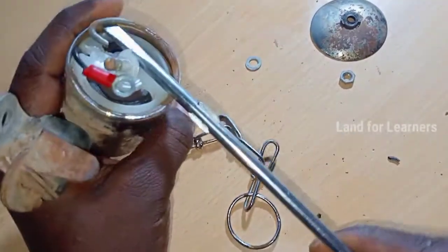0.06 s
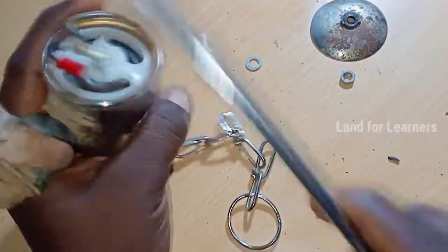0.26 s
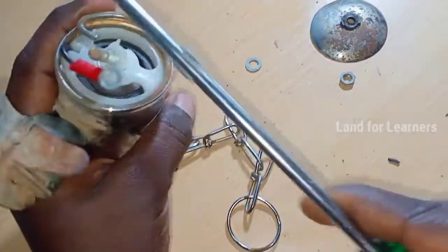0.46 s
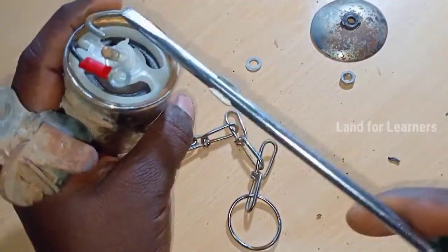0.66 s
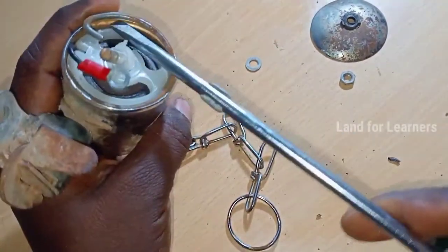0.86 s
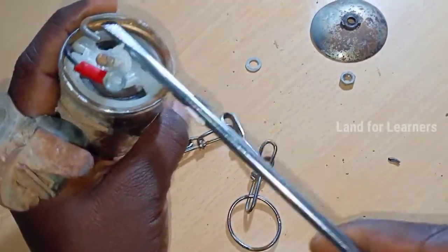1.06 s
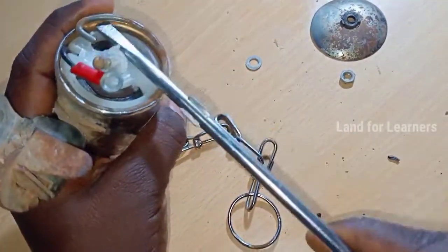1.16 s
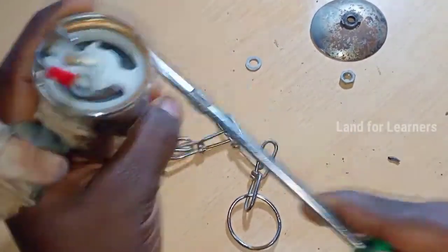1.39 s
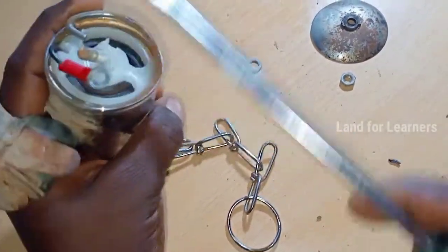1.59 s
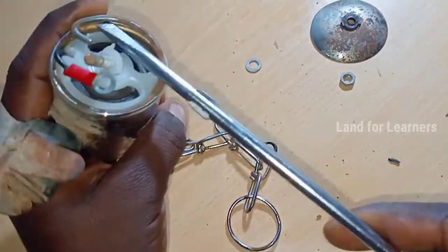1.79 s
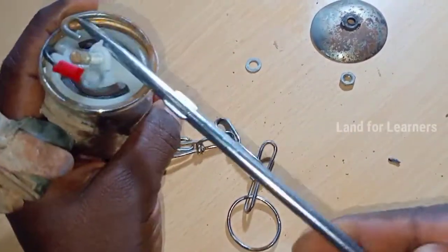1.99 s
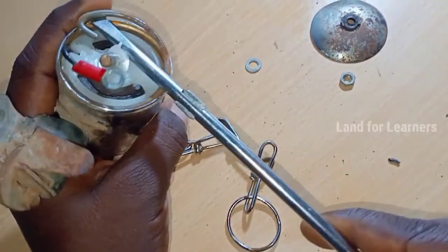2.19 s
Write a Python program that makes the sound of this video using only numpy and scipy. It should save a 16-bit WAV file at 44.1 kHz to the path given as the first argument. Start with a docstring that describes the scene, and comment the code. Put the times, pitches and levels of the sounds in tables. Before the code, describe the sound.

A flat steel blade pries inside a small metal housing: a sharp double clack and gritty scrape early, lighter clicks, another strong clink with scraping midway, then faint taps. Close microphone, hard-walled room, quiet background air.

```python
"""A flat steel blade pries at a ring inside a small hand-held metal housing, in a hard-walled room.
First the scrape rises and the blade taps and catches, loudest near 0.22 and 0.32 s; lighter taps follow.
Near 1.22 s comes another strong contact, then sparser, weaker ones; in all the blade slips hard twice.
Taps are noise-driven modes and swelling sines that the hand damps in milliseconds; scrapes are coloured
grains, bumps are low noise. The room answers with echoes and a tail; faint air and whine run throughout."""
import sys
import numpy as np
from scipy import signal
from scipy.fft import rfft, irfft, next_fast_len
from scipy.io import wavfile
from scipy.ndimage import uniform_filter1d

SR = 44100
rng = np.random.default_rng(int(sys.argv[2]) if len(sys.argv) > 2 else 0)


def dump_mix(stems):
    """Bounce the given channels to the path in sys.argv[1] as a 16-bit WAV at rate SR."""
    frames = np.atleast_2d(stems).T  # one column per channel
    limited = np.clip(frames, -1, 1)  # hard clip at full scale
    pcm = np.round(limited * 32767).astype(np.int16)
    wavfile.write(sys.argv[1], SR, pcm)


N = 99225
TIME_S = np.arange(N) / SR

# Blade contacts: t/s, contact decay/s, knock level/dB, clank f/Hz, clank level/dB, shell level/dB,
# ring f/Hz, ring level/dB, rim f/Hz, rim level/dB, tick level/dB, tick slope/(dB/octave), room send/dB
CONTACTS = [(.1855, .0008, -70, 880, -78, -80, 2930, -72, 5000, -80, -58, 10, -4),
            (0.2182, 0.0018, -37.5, 1154, -23.5, -29, 2744, -8.5, 4200, -25, -25.5, -4, -2.5),
            (0.222, 0.0022, -34.5, 1053, -19.5, -24, 2804, -17, 4200, -25, -24.5, 2.5, -1.5),
            (0.2312, 0.0056, -32, 920, -41, -33, 3010, -30, 3700, -31, -39, 0, 4),
            (0.2747, 0.0071, -34, 1230, -31.5, -27, 3040, -36, 3800, -32, -44, -1, 2),
            (0.3235, 0.0024, -33, 1057, -20, -15.5, 2840, -18.5, 3850, -16, -20, -5, 0.5),
            (0.5745, 0.0022, -65, 1100, -45, -43, 2660, -34.5, 3800, -40, -42, -4.5, 3.5),
            (0.7516, .003, -55, 1010, -34.5, -43, 2820, -32.5, 3500, -40, -52, -6, 0.5),
            (.762, 0.0015, -63, 1000, -51, -42.5, 2700, -25.5, 3500, -36.5, -43.5, -7, -2),
            (0.7674, 0.0016, -64, 1040, -56, -49, 2680, -32.5, 3600, -41, -55, -8, -3),
            (0.8455, .0016, -57, 1027, -29, -26, 2580, -19, 4400, -25, -36, -1, 0),
            (1.052, 0.0028, -50, 1180, -57, -49, 2720, -54.5, 3700, -70, -75, -1, 0),
            (1.1254, .001, -62, 1230, -54, -60, 2690, -54.5, 4200, -68, -72, 0.5, -3),
            (1.2191, 0.0069, -40.5, 913, -30, -23.5, 2610, -13, 3600, -23.5, -31, 1.5, -2.5),
            (1.228, 0.0027, -34, 950, -26, -29, 2600, -27, 4300, -37, -38.5, 5, -4),
            (1.2438, 0.0053, -45, 940, -36, -30, 2605, -25.5, 3600, -32.5, -46, -6, 7),
            (1.3295, 0.0056, -45, 1210, -40.5, -37, 2600, -36.5, 3500, -48, -67, -3, 1),
            (1.366, 0.0043, -44, 1120, -59, -42, 2550, -38.5, 3690, -48.5, -63.5, -7, 0),
            (1.4008, 0.0086, -44, 1120, -54.5, -44.5, 3050, -36.5, 4650, -34, -41, -1, -1),
            (1.6696, 0.0025, -58, 1140, -42, -37, 3400, -35.5, 4560, -38.5, -51, 5, 4),
            (1.6794, 0.0013, -61, 1120, -48, -46, 2600, -33, 4840, -44, -44, 3, -10),
            (1.6878, .0019, -62.5, 900, -60, -51.5, 2710, -35.5, 3590, -62, -64, -4.5, -5),
            (1.7453, 0.0022, -66, 1203, -55.5, -41, 3370, -52, 3580, -46, -58, -2, -4),
            (1.7473, .001, -60, 1045, -46.5, -41, 2620, -30, 3580, -55.5, -69, -2.5, -3),
            (1.9219, 0.0046, -58, 920, -51, -43.5, 2713, -39.5, 3700, -44.5, -61.5, -0.5, 1.5),
            (1.9407, 0.0018, -61.5, 1194, -68.5, -60, 3220, -55, 4200, -59, -63, 5, -6),
            (1.9704, 0.0028, -47, 737, -37, -39, 3110, -40.5, 4000, -47.5, -53, 0.5, 0.5),
            (1.976, 0.002, -50, 943, -40, -48, 3065, -40.5, 4830, -41.5, -44, 4, -2),
            (2.227, .0025, -64, 880, -59.5, -63, 2700, -64.5, 3600, -75, -84, 2.5, 3.5)]
# Modes of the housing's shell: f/Hz, level/dB, t60/s
SHELL_MODES = [(1286, 1, 0.016), (1460, -7, 0.035), (1720, 4.5, 0.0037), (1740, 4.5, 0.01),
               (1980, 2, 0.025), (2140, 0, .008)]
# Modes of the housing's rim: f/Hz, level/dB, t60/s
RIM_MODES = [(3294, 0, 0.0051), (3766, 6, 0.0039), (4180, -1, 0.0042), (4737, -3, 0.005),
             (5233, -10.5, 0.0092), (5634, -16, 0.003)]
# Faint lasting rings of the free steel: f/Hz, level re ring level/dB, t60/s
STEEL_MODES = [(905, -42, .5), (1434, -44, 1), (2630, -40, .6), (3080, -39, 0.4), (3278, -41, .5)]
# Spectrum of the dull knock: f/Hz, relative level/dB
KNOCK_SPECTRUM = [(30, -37.5), (100, -9.5), (250, 0), (450, 6), (650, -7.5), (900, -17), (3000, -50.5)]
# Spectrum of the bright tick, before its slope: f/Hz, relative level/dB
TICK_SPECTRUM = [(3000, -17.5), (5500, -4.5), (6400, -3.5), (7200, 2.5), (8400, 1), (9700, -6.5),
                 (12000, -6.5), (13300, -7), (15200, -2.5), (16000, -15.5)]
# Level of the fluttering grit noise that swells and fades through the work: t/s, level before flutter/dB
GRIT_LEVEL = [(.17, -107), (.205, -65), (.235, -34.5), (.31, -40), (.38, -47), (.45, -38), (.52, -46.5),
              (.65, -63), (.8, -86), (.84, -46), (.9, -55), (1.03, -63.5), (1.07, -46), (1.1, -58),
              (1.16, -48), (1.205, -56), (1.235, -32), (1.34, -38), (1.44, -44.5), (1.53, -63),
              (1.62, -81.5), (1.9, -70.5), (2.05, -61), (2.22, -77)]
# Light skids of the edge: start t/s, length/s, level/dB
EDGE_SKIDS = [(0.214, 0.016, -38), (.385, .19, -46), (0.703, 0.023, -46), (0.725, .014, -42),
              (0.803, .012, -55), (0.833, 0.0094, -50), (1.916, 0.014, -45), (1.966, 0.0099, -48),
              (2.14, .04, -64.5)]
# Spectrum of the grit noise: f/Hz, relative level/dB
GRIT_SPECTRUM = [(100, -28), (330, -4.5), (700, -4.5), (920, 0), (1400, 0), (2100, -2.5), (2650, -4),
                 (3500, -5.5), (5000, -28.5), (8000, -30), (10000, -39), (16000, -44)]
# Spectrum of the skids: f/Hz, relative level/dB
SKID_SPECTRUM = [(500, -19), (1600, -6), (2200, -14), (2750, 7.5), (3500, 0), (4800, -13), (6200, -8.5),
                 (9500, -23), (13000, -20.5), (16000, -22)]
# Housing shifting in the hand: t/s, level/dB, decay/s
HAND_BUMPS = [(.224, -32, 0.031), (.32, -42, 0.023), (.748, -49, 0.0087), (1.06, -59, 0.051),
              (1.125, -56, 0.024), (1.218, -39.5, .025), (1.272, -51, .025), (1.745, -57, .025),
              (1.97, -54.5, 0.036)]
# Spectrum of the bumps: f/Hz, relative level/dB
BUMP_SPECTRUM = [(20, 11.5), (45, -11.5), (110, 4.5), (200, -10), (400, -19.5), (1500, -59)]
# Near reflections from table and walls: t/s, level/dB
NEAR_ECHOES = [(.0032, -20.5), (0.0124, -19)]
# Room decay knots, interpolated to band centres (where every t60 is positive): f/Hz, t60/s
ROOM_DECAY = [(150, 1.5), (500, -0.13), (1400, 0.56), (3000, 0.6142), (7000, 0.59), (14000, 0.33)]
# Room tail colour: f/Hz, relative level/dB
ROOM_SPECTRUM = [(100, 1.5), (500, 0.5), (1200, -1), (2700, -3.5), (4000, 1), (7500, 3), (11000, 1),
                 (15000, 7)]
# Spectrum of the room noise: f/Hz, relative level/dB
AIR_SPECTRUM = [(20, -36), (45, -7), (130, 1.5), (250, -5.5), (480, -4.5), (900, -8), (1700, -12.5),
                (2300, -13), (2700, -8), (4000, -24), (6300, -35), (8300, -31), (9500, -36), (16000, -43.5)]

KNOCK_DECAY_S, ATTACK_PER_CONTACT = .004, .3
CLANK_RISE_S, RING_RISE_S, RIM_RISE_S = .001, .0009, .0005
RISE_PER_CONTACT = 0.13  # added to clank and ring rise, per second of contact
SIDE_RING_HZ, SIDE_RING_DB, SIDE_RING_T60_S = 2918, -12.5, .018
RIM_FOCUS_DB_PER_OCTAVE = 23.5  # fall of the rim modes away from the struck one
RIM_TONE_DB = -3
TICK_CENTRE_HZ = 9000
MODE_SPREAD_DB = 1.5
BODY_LOW_HZ, BODY_HIGH_HZ = 972, 6100
GRAINS_PER_S, GRAIN_SPREAD_DB, GRIT_FLUTTER_DB = 4000, 2.6, 2.6
BUMP_RISE_S = 0.0024
ROOM_DB, ROOM_DELAY_S = -11.5, .008
AIR_DB = -64.5
WHINE_HZ, WHINE_WIDTH_HZ, WHINE_DB = 7480, 380, -83.5
PEAK, MIC_LOW_HZ, CUTOFF_HZ = 1.3, 38, 15550


def from_db(db):
    """Decibels to gain."""
    return 10 ** (np.asarray(db) / 20)


def rms_one(x):
    """Scale to rms 1."""
    return x / np.sqrt(np.mean(x ** 2) + 1e-20)


def unit_hit(x):
    """Scale to the energy of 5 ms at rms 1."""
    return x * np.sqrt(.005 * SR / (np.sum(x ** 2) + 1e-20))


def at_hz(points, hz):
    """Interpolate a table linearly over log frequency."""
    f_hz, values = np.transpose(points)
    return np.interp(np.log(np.maximum(hz, 1)), np.log(f_hz), values)


def colour(x, spectrum):
    """Causal minimum-phase filter: the folded cepstrum of the spectrum gives its phase."""
    size = 2 * next_fast_len(len(x))
    bins_hz = np.arange(size // 2 + 1) * SR / size
    cepstrum = irfft(np.log(from_db(at_hz(spectrum, bins_hz))))
    cepstrum[1:size // 2] *= 2
    cepstrum[size // 2 + 1:] = 0
    response = np.exp(rfft(cepstrum))
    return irfft(rfft(x, size) * response)[:len(x)]


def band_pass(x, low_hz, high_hz):
    """Second-order Butterworth band."""
    sos = signal.butter(2, [low_hz, high_hz], "band", fs=SR, output="sos")
    return signal.sosfilt(sos, x)


def add(out, start_s, x):
    """Mix x in at start_s, cut at the end."""
    i = int(np.clip(start_s * SR, 0, N - 1))
    out[i:i + len(x)] += x[:N - i]


def taps():
    """All contacts with the faint ring they leave in the steel; also their room send."""
    out, sent, blows = np.zeros((3, N))
    for start_s, *settings, room_db in CONTACTS:
        hit = tap(*settings)
        ring_db = settings[6]
        add(out, start_s, hit)
        add(sent, start_s, from_db(room_db) * hit)
        add(blows, start_s, from_db([ring_db]))
    steel = sum(from_db(db) * mode(TIME_S, hz, t60_s) for hz, db, t60_s in STEEL_MODES)
    return out + signal.fftconvolve(blows, steel)[:N], sent


def tap(contact_s, knock_db, clank_hz, clank_db, shell_db, ring_hz, ring_db,
        rim_hz, rim_db, tick_db, slope_db):
    """A short gritty contact force: dull knock, low clank, shell and rim modes, main ring, bright tick."""
    t = TIME_S[:4096]
    attack = 1 - np.exp(-t / (ATTACK_PER_CONTACT * contact_s))
    force = rng.standard_normal((4, len(t))) * np.exp(-t / contact_s) * attack

    knock = colour(rng.standard_normal(len(t)) * np.exp(-t / KNOCK_DECAY_S), KNOCK_SPECTRUM)
    clank = swell(t, clank_hz, CLANK_RISE_S + RISE_PER_CONTACT * contact_s)
    shell = struck(t, force[1], SHELL_MODES)

    side_ring = unit_hit(struck(t, force[0], [(SIDE_RING_HZ, 0, SIDE_RING_T60_S)]))
    ring = swell(t, ring_hz, RING_RISE_S + RISE_PER_CONTACT * contact_s)
    ring = ring + from_db(SIDE_RING_DB) * side_ring

    rim_modes = [(hz, db - RIM_FOCUS_DB_PER_OCTAVE * abs(np.log2(hz / rim_hz)), t60_s)
                 for hz, db, t60_s in RIM_MODES]
    rim = unit_hit(struck(t, force[2], rim_modes))
    rim = rim + from_db(RIM_TONE_DB) * swell(t, rim_hz, RIM_RISE_S)

    tilted = [(hz, db + slope_db * np.log2(hz / TICK_CENTRE_HZ)) for hz, db in TICK_SPECTRUM]
    tick = colour(force[3], tilted)

    layers = [(knock_db, knock), (clank_db, clank), (shell_db, shell),
              (ring_db, ring), (rim_db, rim), (tick_db, tick)]
    return sum(from_db(db) * unit_hit(x) for db, x in layers)


def swell(t, hz, rise_s):
    """A main mode that builds up under the contact and dies in the hand; envelope peaks at rise_s."""
    return unit_hit(np.sin(2 * np.pi * hz * t) * t * np.exp(-t / rise_s))


def struck(t, force, modes):
    """The force rings modes of random strength; the small body radiates no bass."""
    out = np.zeros(len(t))
    for hz, db, t60_s in modes:
        ringing = signal.fftconvolve(force, mode(t, hz, t60_s))[:len(t)]
        out += from_db(db + rng.normal(0, MODE_SPREAD_DB)) * unit_hit(ringing)
    return band_pass(out, BODY_LOW_HZ, BODY_HIGH_HZ)


def mode(t, hz, t60_s):
    """A struck mode: sine with exponential decay."""
    return np.sin(2 * np.pi * hz * t) * from_db(-60 * t / t60_s)


def scrapes():
    """Steel grit coloured two ways: an uneven, fluttering grit noise and short bright skids of the edge."""
    slow_noise = uniform_filter1d(rng.standard_normal(N), size=260)
    flutter = rms_one(uniform_filter1d(slow_noise, size=200))
    grit_db = np.interp(TIME_S, *np.transpose(GRIT_LEVEL)) + GRIT_FLUTTER_DB * flutter
    grit_noise = from_db(grit_db) * rms_one(colour(grit(), GRIT_SPECTRUM))

    skid_level = np.zeros(N)
    for start_s, length_s, db in EDGE_SKIDS:
        phase = np.clip((TIME_S - start_s) / length_s, 0, 1)
        skid_level += from_db(db) * np.sin(np.pi * phase)
    return grit_noise + skid_level * rms_one(colour(grit(), SKID_SPECTRUM))


def grit():
    """Random tiny catches of steel on steel: sparse signed impulses, rms 1."""
    sizes = from_db(GRAIN_SPREAD_DB * np.minimum(rng.exponential(1, N), 4))
    signs = rng.choice([-1, 1], N)
    caught = rng.random(N) < GRAINS_PER_S / SR
    return rms_one(sizes * signs * caught)


def bumps():
    """Dull thuds of the housing in the hand: low noise under quick-rising, decaying envelopes."""
    level = np.zeros(N)
    for start_s, db, decay_s in HAND_BUMPS:
        rise = 1 - np.exp(-TIME_S / BUMP_RISE_S)
        add(level, start_s, from_db(db) * np.exp(-TIME_S / decay_s) * rise)
    return level * rms_one(colour(rng.standard_normal(N), BUMP_SPECTRUM))


def room(x):
    """Two near reflections and a diffuse noise tail that dies band by band."""
    edges_hz, response = np.geomspace(80, 17000, num=15), np.zeros(N)
    for low_hz, high_hz in zip(edges_hz, edges_hz[1:]):
        centre_hz = np.sqrt(low_hz * high_hz)
        band = band_pass(rng.standard_normal(N), low_hz, high_hz)
        decay_db = -60 * TIME_S / at_hz(ROOM_DECAY, centre_hz)
        add(response, ROOM_DELAY_S, band * from_db(at_hz(ROOM_SPECTRUM, centre_hz) + decay_db))
    response *= from_db(ROOM_DB) / np.sqrt(np.sum(response ** 2))
    for delay_s, db in NEAR_ECHOES:
        add(response, delay_s, from_db([db]))
    return signal.fftconvolve(x, response)[:N]


def background():
    """Quiet coloured room noise with a thin, high, steady whine of narrow-band noise."""
    half_hz = WHINE_WIDTH_HZ / 2
    whine = rms_one(band_pass(rng.standard_normal(N), WHINE_HZ - half_hz, WHINE_HZ + half_hz))
    air = rms_one(colour(rng.standard_normal(N), AIR_SPECTRUM))
    return from_db(WHINE_DB) * whine + from_db(AIR_DB) * air


def scene():
    """The work on the housing, its room and the still air."""
    hits, sent = taps()
    handling = scrapes() + bumps()
    return (hits + handling + room(sent + handling) + background())[None]


def record(dry):
    """Peaks are rounded, the microphone drops the deepest bass, the top is cut."""
    rounded = PEAK * np.tanh(dry / PEAK)
    bass_cut = signal.butter(4, MIC_LOW_HZ, "high", fs=SR, output="sos")
    top_cut = signal.ellip(10, .3, 75, CUTOFF_HZ, fs=SR, output="sos")
    return signal.sosfilt(top_cut, signal.sosfilt(bass_cut, rounded))


dry = scene()
out = record(dry)
dump_mix(out)
```